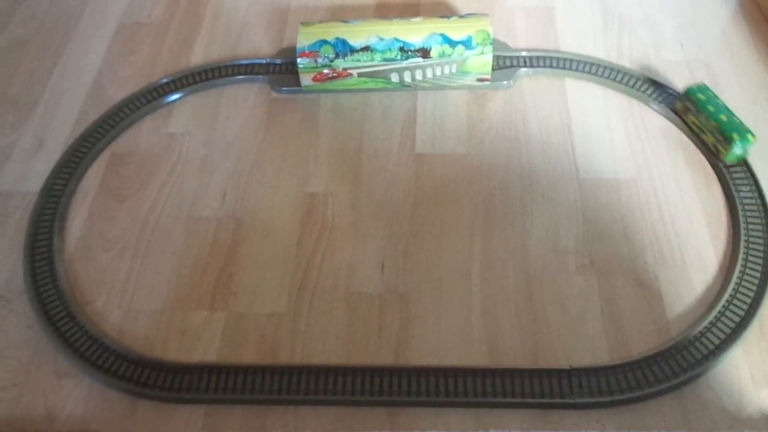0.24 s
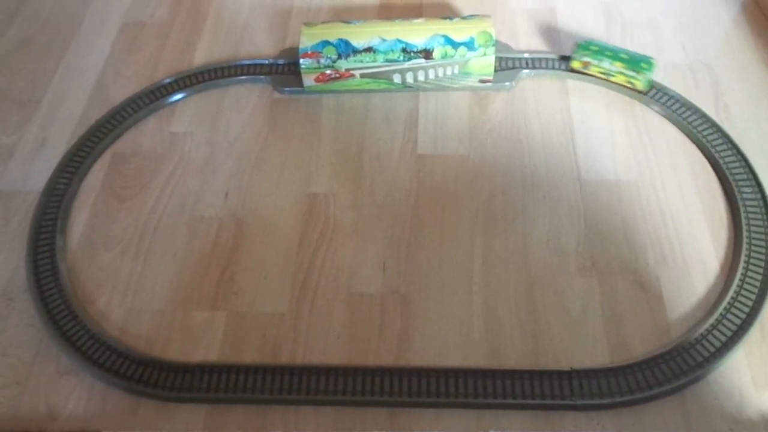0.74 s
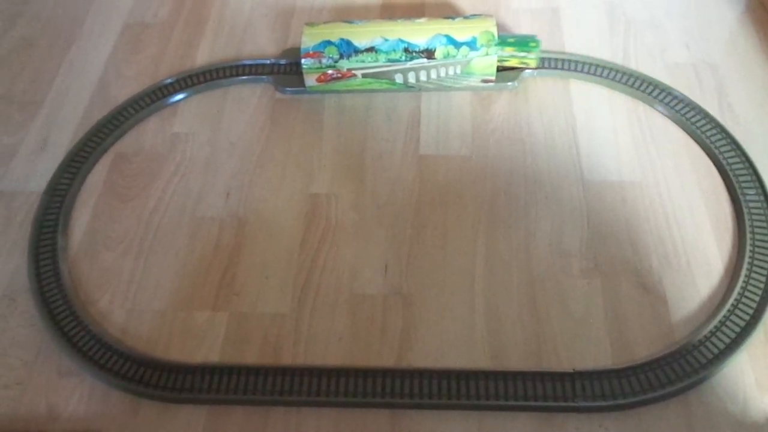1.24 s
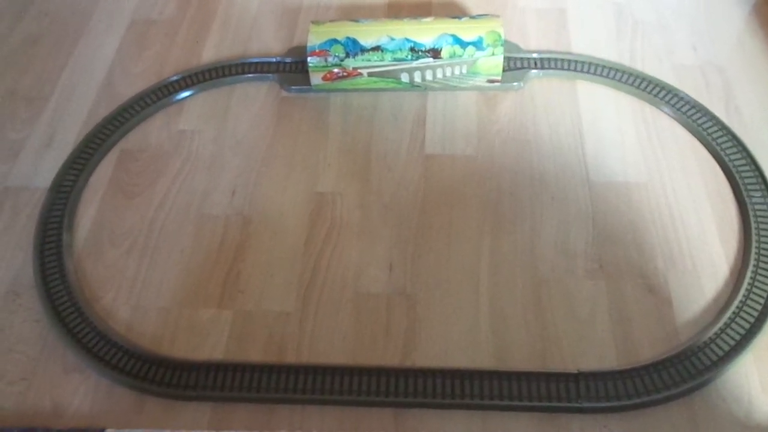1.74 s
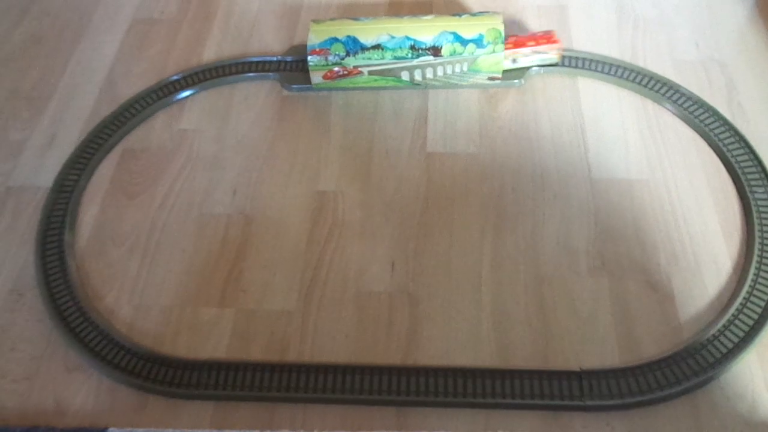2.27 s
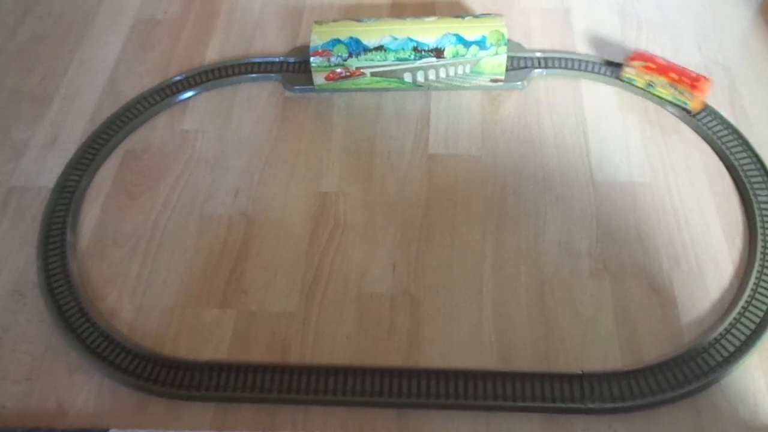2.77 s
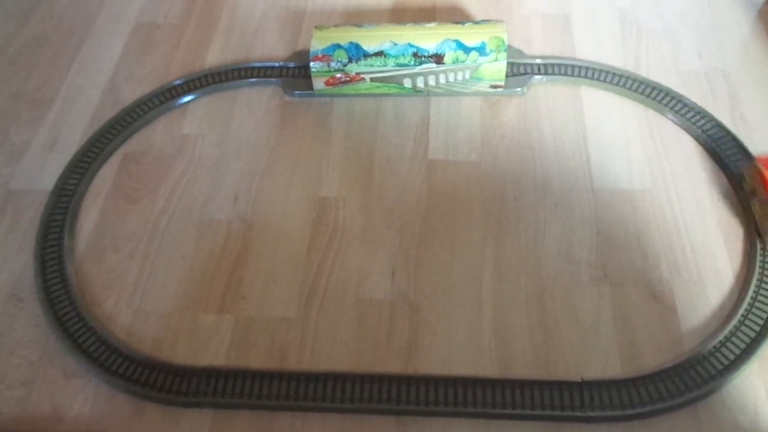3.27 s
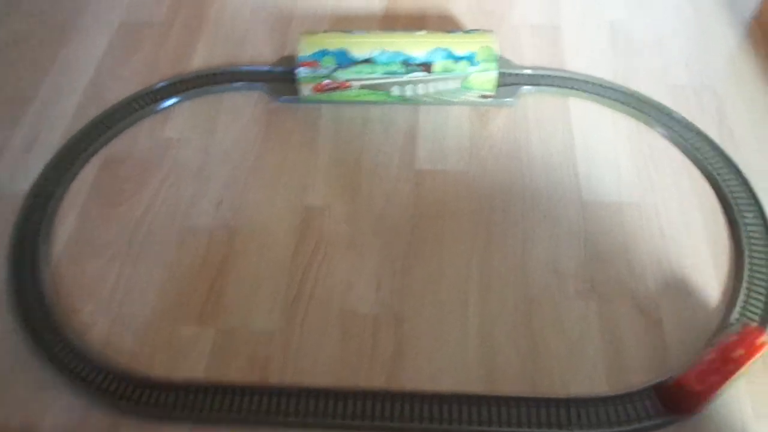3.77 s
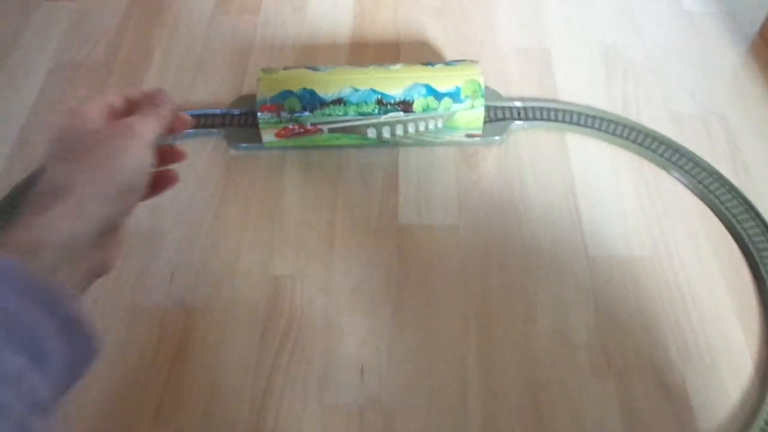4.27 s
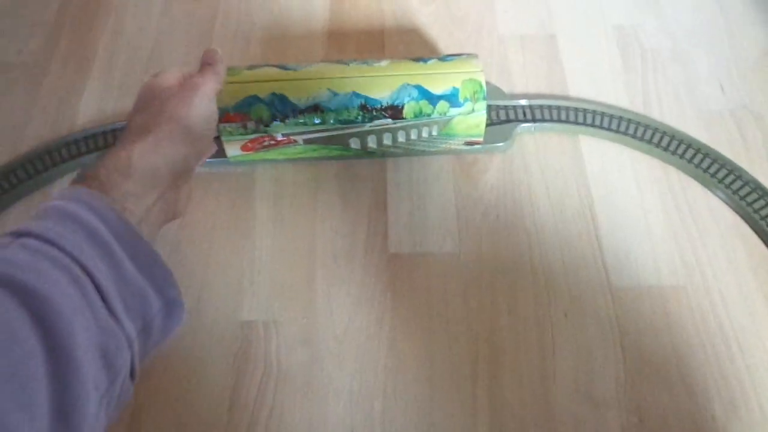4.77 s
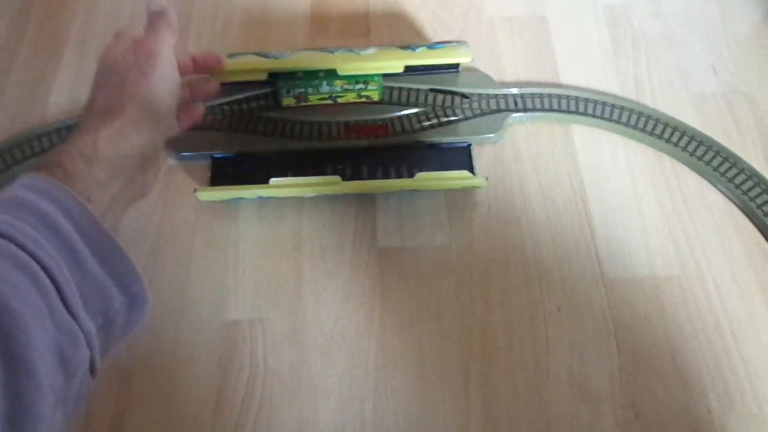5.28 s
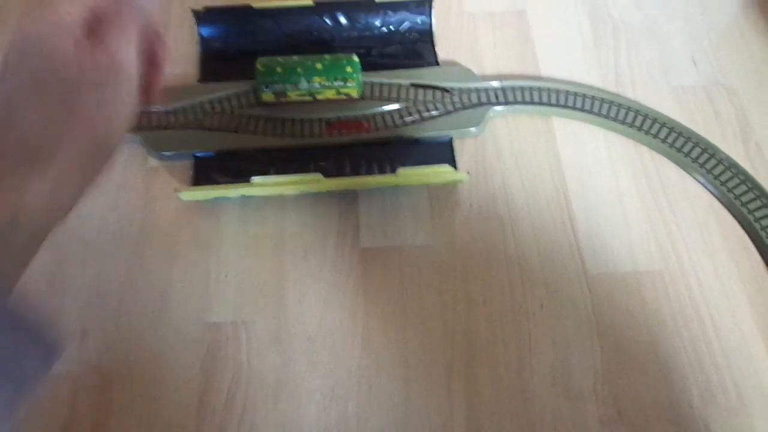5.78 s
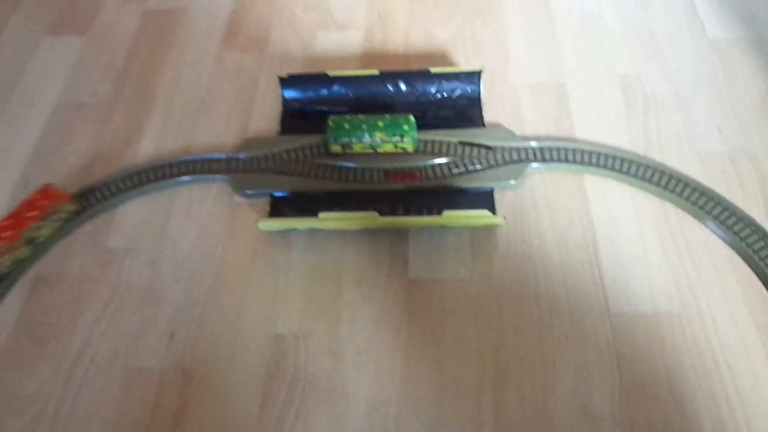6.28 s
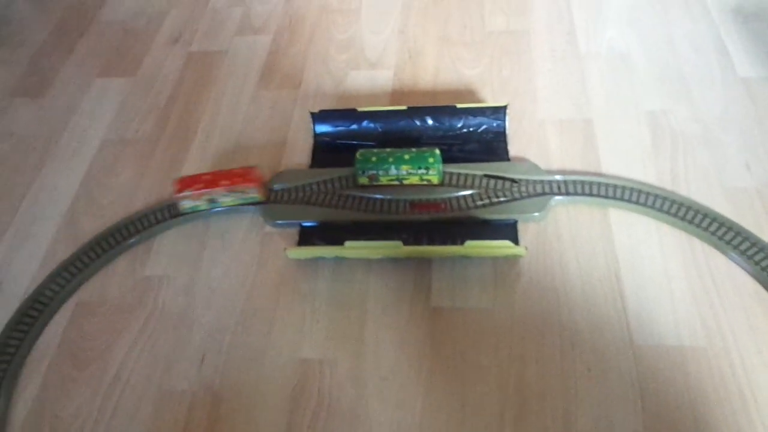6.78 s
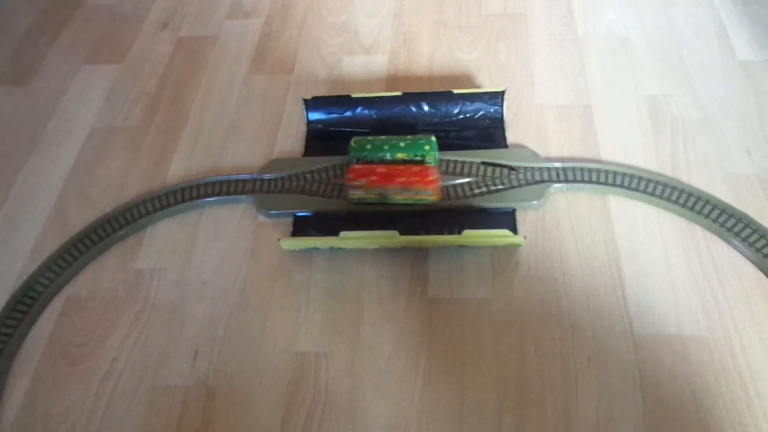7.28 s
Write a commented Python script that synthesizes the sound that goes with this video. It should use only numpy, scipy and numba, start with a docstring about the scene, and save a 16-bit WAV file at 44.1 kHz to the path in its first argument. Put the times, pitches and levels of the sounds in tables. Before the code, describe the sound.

Steady grainy metallic whirring of a small wind-up toy on rails, with tinny knocks, two hard plastic clatters and a final abrupt stop.

```python
"""Clockwork tin cars on a floor track

On a wooden floor a green tin car rolls into a tunnel and bumps a red one off, which runs on close under the phone.
Random clicks of gear teeth and wheels excite the resonances of the shells, the clockwork and the track.
A hand unlatches the tunnel: its catch pops and two plastic halves slap down, as noise bursts with ringing modes.
Picked up by a phone above the track in a small room, almost in mono; at the end the red car runs into the other.
"""
import sys
import numpy as np
from scipy import signal
from scipy.fft import rfft, irfft
from scipy.io import wavfile
from scipy.ndimage import uniform_filter1d
from numba import njit

SR = 44100
rng = np.random.default_rng(int(sys.argv[2]) if len(sys.argv) > 2 else 0)


def inscribe(sig):
    """Save sig as 16-bit PCM at rate SR to the path in sys.argv[1].

    A 1-D sig is mono; a 2-D sig holds one channel per row.
    Samples are clipped to [-1, 1] before scaling.
    """
    pcm = np.round(np.clip(np.atleast_2d(sig).T, -1, 1) * 32767)
    wavfile.write(sys.argv[1], SR, pcm.astype(np.int16))


N = 331632
TIME = np.arange(N) / SR  # s
HANDOVER_S = 2.3  # green car heard before, red car after
PASS_S, PASS_LENGTH_S = 4.61, 0.29  # the car is closest to the phone

# how hard the car rides each stretch of track: t/s, shell level/dB, track rumble level/dB
RIDE_LEVELS = [(0, -31, -38.5), (.27, -37, -45.5), (.6, -31, -42), (.93, -29.5, -39), (1.4, -30.5, -44.5),
               (2.95, -28.5, -40.5), (3.95, -28, -37.5), (4.35, -29.5, -40), (5.6, -29.5, -40.5),
               (5.92, -28, -37.5), (6.1, -31, -43), (6.55, -26.5, -41.5), (6.76, -29, -43.5),
               (7.15, -26, -38.5)]
GEAR_DB = -3  # gear whirr re shell
TUNNEL_SHELL_DB, TUNNEL_GEAR_DB = -7, -7.5  # the tunnel walls screen the gears most
PASS_SHELL_DB, PASS_GEAR_DB = 5, -0.5  # close under the phone


def running_car():
    """Gear teeth and wobbling wheels shake the shell, the clockwork and the track."""
    speed_db, hidden, close = journey()
    ride_db, rumble_db = curves(RIDE_LEVELS)
    shell_db = ride_db + speed_db + TUNNEL_SHELL_DB * hidden + PASS_SHELL_DB * close
    gear_db = ride_db + speed_db + GEAR_DB + TUNNEL_GEAR_DB * hidden + PASS_GEAR_DB * close
    track_db = rumble_db + speed_db

    wobble = undb(1.0 * walk(20) + 0.18 * walk(170))  # loose axles press and release the gears
    teeth = moving_room(wobble * ticks(rate=4600, spread_db=3.1), ring_db=-6, wet_db=-3)
    wheels = moving_room(wobble * ticks(rate=1100, spread_db=3.5), ring_db=3.5, wet_db=0.5)
    rattle = moving_room(wobble * ticks(rate=1200, spread_db=3.0), ring_db=6.5, wet_db=-7.0)
    sleepers = moving_room(wobble * ticks(rate=1200, spread_db=2.0), ring_db=-8.0, wet_db=-7.0)

    shell = tin_shell(wheels, teeth, rattle, close)
    gears = gear_whirr(teeth, rattle, gear_db)
    track = track_rumble(sleepers)
    return undb(shell_db) * shell + undb(gear_db) * gears + undb(track_db) * track


TUNNEL_IN_S, TUNNEL_OUT_S, ENTER_S, LEAVE_S = 1.09, 2.36, 0.1, 0.32
BUMP_S, SET_OFF_DB, SPIN_UP_S = 1.863, -6.5, 0.3  # the waiting car is bumped off and gathers speed
STOP_S, STOP_DB_PER_S = 7.33, -113  # it runs into the other car and stops


def journey():
    """Level change with speed (dB), hiding in the tunnel (0-1) and closeness to the phone (0-1)."""
    setting_off = (TIME > BUMP_S) * np.clip(1 - (TIME - BUMP_S) / SPIN_UP_S, 0, 1)
    stopping_db = STOP_DB_PER_S * np.maximum(TIME - STOP_S, 0)
    speed_db = SET_OFF_DB * setting_off + stopping_db
    hidden = ramp(TUNNEL_IN_S, ENTER_S) - ramp(TUNNEL_OUT_S, LEAVE_S)
    close = np.exp(-((TIME - PASS_S) / PASS_LENGTH_S) ** 2)
    return speed_db, hidden, close


# the shell's two resonances shift as the car turns: t/s, lower f/Hz, upper f/Hz, upper re lower level/dB
TURNING_RESONANCES = [(0, 1110, 2230, 3), (1.0, 1150, 2170, -3), (1.55, 1260, 2150, 0),
                      (2.2, 1630, 2130, -4.5), (3.05, 1150, 2280, 8), (3.6, 1156, 2120, 2.5),
                      (5.35, 1310, 1980, -1), (6.4, 1420, 2170, 5), (6.7, 1240, 2090, 0),
                      (7.5, 1090, 2050, -3)]
# spectrum of the shell's other panels: f/Hz, level/dB
PANEL_SPECTRUM = [(150, -51), (650, -17), (950, 0.5), (1350, 3), (1750, -1.5), (2300, -2), (2700, 0),
                  (3200, -20.5), (4500, -27)]
GREEN_WIDTH_HZ, RED_WIDTH_HZ = 160, 300  # lower resonance of each car
PASS_LOWER_HZ, PASS_UPPER_HZ, PASS_WIDTH_HZ = 1290, 1770, 920  # close by, the two draw together
PANEL_DB, PASS_PANEL_DB = 0, -13  # panels re both resonances, and the change close by


def tin_shell(wheels, teeth, rattle, close):
    """Wheels excite the lower resonance, teeth the upper one, and rattling the other panels."""
    lower_hz, upper_hz, upper_db = curves(TURNING_RESONANCES)
    lower_hz = lower_hz + close * (PASS_LOWER_HZ - lower_hz)
    upper_hz = upper_hz + close * (PASS_UPPER_HZ - upper_hz)
    car_width = np.where(TIME > HANDOVER_S, RED_WIDTH_HZ, GREEN_WIDTH_HZ)
    lower_width = (1 - close) * car_width + close * PASS_WIDTH_HZ

    lower = shell_resonance(wheels, lower_hz, lower_width, swell_db=0.5)
    upper = shell_resonance(teeth, upper_hz, 454, swell_db=1.26)
    resonances = (lower + undb(upper_db) * upper) / np.hypot(1, undb(upper_db))
    panel_gain = undb(PANEL_DB + PASS_PANEL_DB * close)
    panels = unit(colour(rattle, PANEL_SPECTRUM))
    return (resonances + panel_gain * panels) / np.hypot(1, panel_gain)


def shell_resonance(x, hz, width, swell_db):
    """A steep resonance of steady power that swells and wavers as the wheel flanges rub."""
    hz = hz * (1 + 0.035 * walk(14))
    ring = bandpass(bandpass(x, hz, width), hz, 1.3 * width) / np.sqrt(width)
    return unit(ring * undb(swell_db * walk(24)))


# rings of each car's small metal parts: f/Hz, width/Hz, level/dB
GREEN_RINGS = [(3670, 140, 15.5), (4470, 340, 12.5), (4860, 53, -5), (6940, 160, 16)]
RED_RINGS = [(4630, 260, 1.5), (5300, 67, -19), (5870, 330, -7), (7140, 65, -7), (8000, 65, 0)]
# rings re tooth clicks; the red car's are strong as it nears the phone, weak once past
GREEN_RING_DB, APPROACH_RING_DB, PASSED_RING_DB = -6.5, -8.5, -13.5


def gear_whirr(teeth, rattle, gear_db):
    """The clockwork of the green car, then the red; it loses treble when it is faint."""
    passed = ramp(PASS_S, 2 * PASS_LENGTH_S)
    red_ring_db = APPROACH_RING_DB + (PASSED_RING_DB - APPROACH_RING_DB) * passed
    red = clockwork(teeth, rattle, RED_RINGS, red_ring_db)
    green = clockwork(teeth, rattle, GREEN_RINGS, GREEN_RING_DB)
    gears = np.where(TIME > HANDOVER_S, red, green)
    # a car that is slow or hidden in the tunnel loses its top octave first
    dull = colour(gears, [(6500, -0.22), (11000, -1.7)])
    openness = np.interp(gear_db, [-45, -34], [0, 1])
    return openness * gears + (1 - openness) * dull


# spectrum of the clockwork: f/Hz, level/dB
GEAR_SPECTRUM = [(300, -67), (2000, -26), (3000, 1), (3800, 1), (5000, 0.5), (7000, -0.5), (9500, -3),
                 (12300, -6), (14500, -16.5)]


def clockwork(teeth, shaking, rings, ring_db):
    """Bare tooth clicks, plus the rings of small metal parts that the ride shakes."""
    clicks = unit(colour(teeth, GEAR_SPECTRUM))
    ringing = sum(undb(db) * bandpass(shaking, hz, width) for hz, width, db in rings)
    return unit(clicks + undb(ring_db) * unit(colour(ringing, GEAR_SPECTRUM)))


# spectrum of the track's rumble: f/Hz, level/dB
TRACK_SPECTRUM = [(40, -41), (90, -29.5), (170, -21), (300, -10), (430, -7.5), (540, 2.5), (680, 4.5),
                  (850, -1), (1050, -28), (1600, -28.5)]


def track_rumble(sleepers):
    """Small impacts on the sleepers, coloured by the body of the track."""
    return unit(colour(sleepers, TRACK_SPECTRUM))


# a car jolts over joints and points or bumps the other: t/s, level/dB, treble level/dB, drops back after t/s
CAR_JOLTS = [(.03, -26, -9, 0.039), (.986, -17.5, -8, 0.038), (1.204, -26.5, -7, .02),
             (1.501, -30, -8, 0.027), (1.586, -20.5, -1, 0.046), (1.604, -17.5, -0.5, 0.054),
             (1.77, -11, -5, 0.027), (2.28, -26, -9, 0.038), (4.124, -21.5, -3.5, 0.019),
             (6.216, -34, -4, 0.033), (6.846, -19, 0, 0.025), (6.975, -19, -11, .021),
             (7.252, -14.5, 3, 0.018), (7.267, -17, 13, 0.03), (7.376, -12.5, -6, .046)]
# spectrum of such a knock: f/Hz, level/dB
JOLT_SPECTRUM = [(30, -36), (130, -34), (300, -20), (450, -20), (620, 2), (850, -3), (1200, -2),
                 (2200, 0.5), (3200, -2.5), (7000, -8.5), (12500, -11.5), (15000, -20)]
# ringing modes of the tin: f/Hz, level/dB, t60/s
JOLT_MODES = [(685, -3, .12), (760, -4, .14), (1125, -2, .12), (1370, -5, .12), (1930, 0, .16),
              (2400, -8, .14)]
DROP_BACK_DB, DROP_BACK_TREBLE_DB = -5.5, 7  # second knock re the first


def jolts():
    """Tin wheels and bumpers knock on the track, and again more lightly as the car drops back."""
    knocks = []
    drops = []
    for s, db, treble_db, after_s in CAR_JOLTS:
        knocks.append((s, db, treble_db))
        drops.append((s + after_s, db + DROP_BACK_DB, treble_db + DROP_BACK_TREBLE_DB))
    dry = strike(knocks + drops, JOLT_SPECTRUM, JOLT_MODES, rise_s=0.0027, crack_t60=0.12, ring_db=-12)
    return room(dry, wet_db=-6)


def flange_tick():
    """A wheel flange snaps against the rail: one hard, bright tick, a fast-decaying sine."""
    age = np.maximum(TIME - 3.5918, 0)
    snap = undb(-9) * np.exp(-age / 0.0006) * np.sin(2 * np.pi * 6300 * age)
    return bandpass(snap, 6300, 4000)


# the tunnel's catch slips open with hollow pops: t/s, level/dB
CATCH_POPS = [(4.926, -9.5), (4.958, -8.5), (4.973, -22), (5.002, -23)]
# spectrum of a pop: f/Hz, level/dB
POP_SPECTRUM = [(60, -46), (150, -36), (520, -17), (650, 0), (820, -1), (1000, -19), (2400, -25),
                (5000, -42), (12000, -54)]
# ringing modes of the catch: f/Hz, level/dB, t60/s
POP_MODES = [(648, -6, 0.073), (750, -17, 0.046), (815, 4, 0.038)]


def tunnel_catch():
    """The catch pops open: short bursts with a few hollow, quickly damped modes."""
    dry = strike(CATCH_POPS, POP_SPECTRUM, POP_MODES, rise_s=0.001, crack_t60=0.045, ring_db=-7)
    return room(dry, wet_db=-12.0)


# the front half falls and bounces: t/s, level/dB, treble level/dB
FRONT_SLAPS = [(5.109, -5, -2), (5.120, -10.5, 18), (5.144, -10, 5), (5.168, -8, 1), (5.179, -12, 3),
               (5.190, -10.5, 9)]
# spectrum of its slap: f/Hz, level/dB
FRONT_SPECTRUM = [(30, -27), (130, -31), (280, -15.5), (400, 1.5), (480, -5.5), (630, 9), (1000, 2.5),
                  (2000, 2.5), (2500, -1), (3200, -1.5), (5000, -7.5), (12000, -15), (15000, -24)]
# its ringing modes: f/Hz, level/dB, t60/s
FRONT_RINGS = [(635, -11, 0.071), (774, -0.5, 0.22), (1850, 2, 0.2), (2260, -10, 0.27), (3270, 1, 0.099),
               (3250, -11, 0.21)]


def front_half():
    """The plastic front half slaps on the floor and chatters to rest."""
    dry = strike(FRONT_SLAPS, FRONT_SPECTRUM, FRONT_RINGS, rise_s=0.00041, crack_t60=0.11, ring_db=-15.5)
    return room(dry, wet_db=-4.5)


# the back half falls and bounces: t/s, level/dB, treble level/dB
BACK_SLAPS = [(5.649, -5, 3.5), (5.656, 0.5, -12), (5.665, -5, 15), (5.679, -16, 16), (5.692, -8.5, 23),
              (5.714, -8.5, 13), (5.741, -10, 1)]
# spectrum of its slap: f/Hz, level/dB
BACK_SPECTRUM = [(30, -29), (100, -39), (190, -22), (400, -19.5), (580, 0), (900, -10.5), (1200, 0.5),
                 (2000, 2.5), (3000, -3), (5000, -9.5), (12000, -18), (15000, -27)]
# its ringing modes: f/Hz, level/dB, t60/s
BACK_RINGS = [(590, -18, 0.23), (1530, -17, 0.33), (1680, 4, 0.22), (1800, -17, .5), (1960, -4, .4),
              (2260, 4, 0.68), (2350, -16, 0.4), (2410, -4, 0.43), (2737, -15, 0.66), (3100, -23, 0.24),
              (3620, -19, 0.28)]


def back_half():
    """The plastic back half slaps down after the front one and rings longer."""
    dry = strike(BACK_SLAPS, BACK_SPECTRUM, BACK_RINGS, rise_s=0.001, crack_t60=0.078, ring_db=-24.5)
    return room(dry, wet_db=-2.5)


# spectrum of plastic rubbing on plastic: f/Hz, level/dB
RUB_SPECTRUM = [(300, -30), (1000, -2.5), (2200, 4), (4000, -5), (12000, -14)]
RUB_S, RUB_LENGTH_S, RUB_DB = 4.98, 0.09, -29


def prising():
    """The halves stick and slip as the hand prises them apart: a brief swell of fine clicks."""
    swell = np.exp(-((TIME - RUB_S) / RUB_LENGTH_S) ** 2)
    clicks = unit(colour(ticks(rate=2800, spread_db=3.5), RUB_SPECTRUM))
    return undb(RUB_DB) * room(swell * clicks, wet_db=-0.5)


# heavy landings also thump the floorboards: t/s, level/dB
FLOOR_THUMPS = [(1.772, -48), (5.111, -32), (5.655, -36), (5.692, -43), (7.375, -55)]
# spectrum of a thump: f/Hz, level/dB
THUMP_SPECTRUM = [(40, -15), (110, 2), (200, -5), (500, -28)]


def floorboards():
    """A dull, short thump under each heavy landing, without ringing modes."""
    return strike(FLOOR_THUMPS, THUMP_SPECTRUM, [], rise_s=0.0012, crack_t60=0.057, ring_db=0)


def strike(blows, spectrum, modes, rise_s, crack_t60, ring_db):
    """Each blow is a brief chatter of contacts, coloured by the object, plus its few lasting modes."""
    out = np.zeros(N + SR)
    attack = 1 - np.exp(-TIME[:SR] / rise_s)
    envelope = attack * fade(crack_t60)
    for s, db, *treble_db in blows:
        crack = colour(rng.standard_normal(SR) * envelope, spectrum)
        if treble_db:  # harder contact, brighter crack
            crack = colour(crack, [(800, 0), (4000, treble_db[0])])
        crack *= np.linalg.norm(envelope) / np.linalg.norm(crack)
        ring = 0
        for hz, mode_db, t60 in modes:
            detune = 1 + 0.0025 * rng.standard_normal()
            phase = 2 * np.pi * rng.random()
            ring = ring + undb(mode_db) * fade(t60) * np.sin(2 * np.pi * hz * detune * TIME[:SR] + phase)
        start = int(s * SR)
        out[start:start + SR] += undb(db) * (crack + undb(ring_db) * attack * ring)
    return out[:N]


def ticks(rate, spread_db):
    """Irregular tiny impacts, rate per second on average: many weak, a few strong."""
    size = undb(spread_db * np.minimum(rng.exponential(size=N), 4))
    struck = rng.random(N) < rate / SR
    return unit(struck * size * rng.choice([-1, 1], N))


ROOM_T60_S = 0.45
HOP_S = 0.2  # time on one stretch of track


def moving_room(x, ring_db, wet_db):
    """Each stretch of track has its own short metallic ring and room echoes; the car glides between them."""
    hop = int(HOP_S * SR)
    out = np.zeros(N + 2 * SR)
    ring_shape = fade(0.068)
    tail_shape = fade(ROOM_T60_S) * (1 - np.exp(-TIME[:SR] / 0.018))
    ring = undb(ring_db) * ring_shape / np.linalg.norm(ring_shape)
    tail = undb(wet_db) * tail_shape / np.linalg.norm(tail_shape)
    response = np.hypot(ring, tail)[:SR // 2]
    padded = np.pad(x, (hop, 2 * hop))
    window = np.sin(np.pi * np.arange(2 * hop) / (2 * hop))  # equal-power crossfade
    for start in range(0, N + hop, hop):
        stretch = padded[start:start + 2 * hop] * window
        echo = signal.fftconvolve(stretch, response * rng.standard_normal(SR // 2))
        out[start:start + len(echo)] += echo
    return unit(x + out[hop:hop + N])


def room(x, wet_db):
    """Direct sound plus a diffuse tail that builds up as the walls answer."""
    tail = rng.standard_normal(SR) * fade(ROOM_T60_S) * (1 - np.exp(-TIME[:SR] / 0.0075))
    return x + undb(wet_db) * signal.fftconvolve(x, tail / np.linalg.norm(tail))[:N]


def colour(x, points):
    """Causal minimum-phase filter with the gain of (f/Hz, level/dB) points."""
    size = 4096
    hz, db = np.transpose(points)
    bins = np.maximum(np.arange(size // 2 + 1) * SR / size, 1)
    gain = undb(np.interp(np.log(bins), np.log(hz), db))
    cepstrum = irfft(np.log(gain))
    cepstrum[1:size // 2] *= 2  # folding the cepstrum makes the filter causal
    cepstrum[size // 2 + 1:] = 0
    return signal.fftconvolve(x, irfft(np.exp(rfft(cepstrum))))[:len(x)]


def bandpass(x, hz, width):
    """Resonance with a fixed or moving centre and width, both in Hz."""
    return resonate(x, hz * np.ones(N), width * np.ones(N))


@njit
def resonate(x, hz, width):
    """State-variable band-pass; gain 1 at the centre."""
    y = np.empty(len(x))
    band, low = 0., 0.
    for i in range(len(x)):
        g = np.tan(np.pi * hz[i] / SR)
        k = width[i] / hz[i]
        v = (band + g * (x[i] - low)) / (1 + g * (g + k))
        band = 2 * v - band
        low = low + 2 * g * v
        y[i] = k * v
    return y


def walk(rate):
    """Random levels held 1 / rate s and slewed, at rms 1."""
    hold = max(int(SR / rate), 1)
    steps = np.repeat(rng.standard_normal(N // hold + 1), hold)
    return unit(uniform_filter1d(steps, hold)[:N])


def ramp(middle_s, length_s):
    """Rises evenly from 0 to 1 around a moment."""
    return np.clip((TIME - middle_s) / length_s + 0.5, 0, 1)


def fade(t60):
    """Exponential decay by 60 dB in t60 seconds, one second long."""
    return np.exp(-np.log(1000) * TIME[:SR] / t60)


def curves(rows):
    """Each column of a timed table, sample by sample."""
    s, *columns = np.transpose(rows)
    return [np.interp(TIME, s, column) for column in columns]


def undb(db):
    """Decibels to gain."""
    return 10 ** (np.asarray(db) / 20)


def unit(x):
    """Scale to rms 1."""
    return x / np.sqrt(np.mean(x ** 2))


# the faint difference between the two channels: f/Hz, side re mid level/dB
SIDE_SPECTRUM = [(40, -6), (800, -47.5), (2800, -55), (13000, -37.5)]


def scene():
    """Both channels carry nearly the same sound; a faint, slightly smeared difference between them is strongest
    in the deep bass and the top treble."""
    cars = running_car() + jolts() + flange_tick()
    tunnel = tunnel_catch() + front_half() + back_half() + prising()
    mid = cars + tunnel + floorboards()
    scatter = rng.standard_normal(SR) * fade(0.21)
    scattered = signal.fftconvolve(mid, scatter / np.linalg.norm(scatter))[:N]
    side = colour(scattered, SIDE_SPECTRUM)
    return np.array([mid + side, mid - side])


def record(dry):
    """The phone clips peaks beyond full scale, then cuts the top steeply above 15050 Hz."""
    clipped = np.clip(dry, -1, 1)
    top_cut = signal.ellip(10, 0.2, 70, 15050, fs=SR, output="sos")
    return signal.sosfilt(top_cut, clipped)


dry = scene()
out = record(dry)
inscribe(out)
```